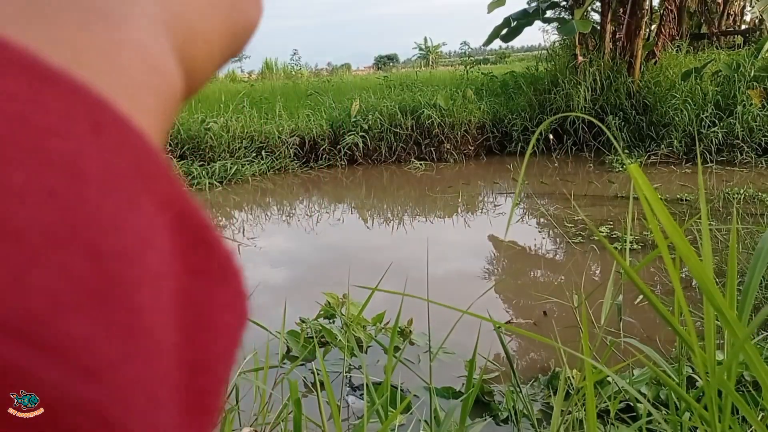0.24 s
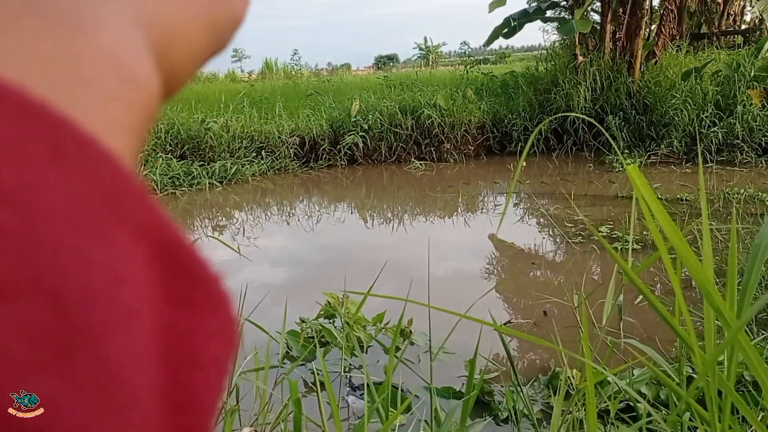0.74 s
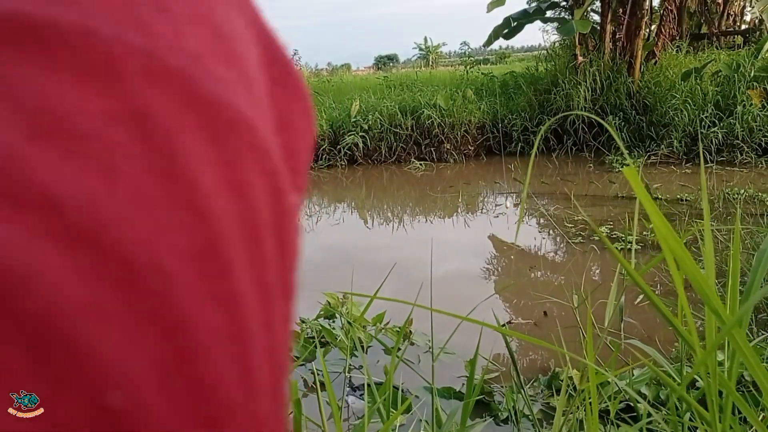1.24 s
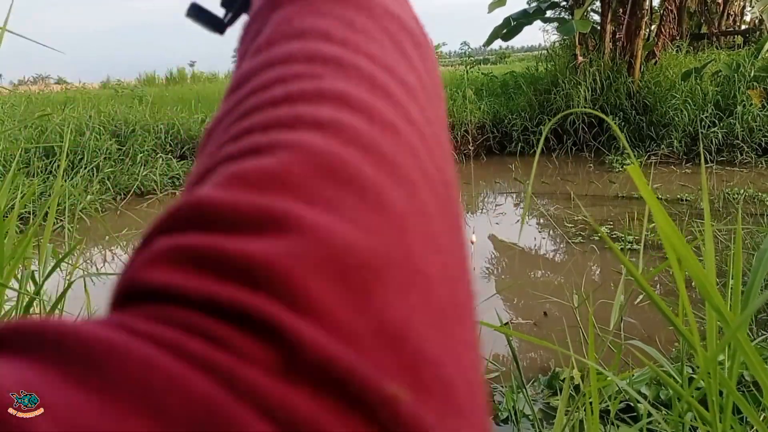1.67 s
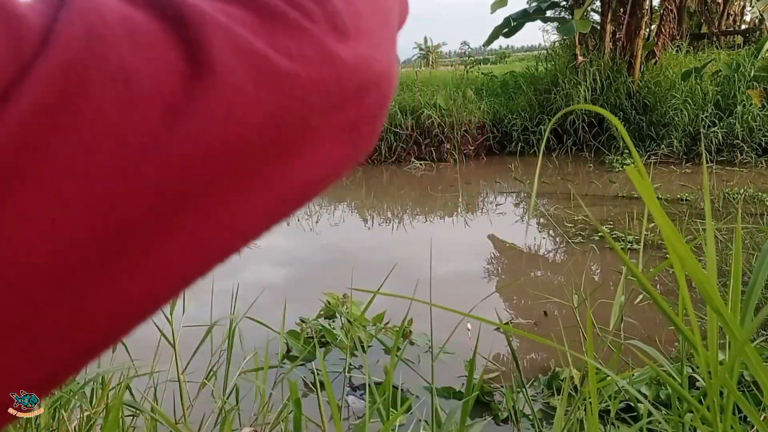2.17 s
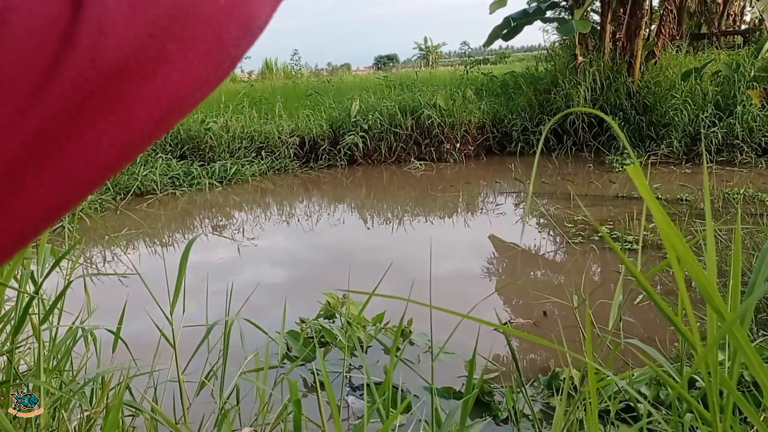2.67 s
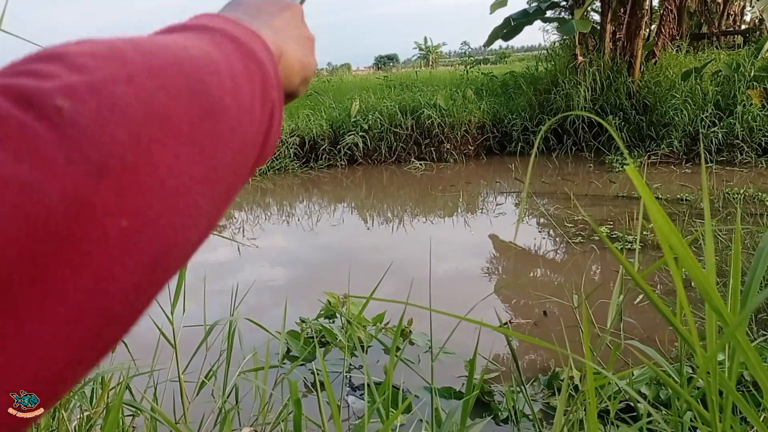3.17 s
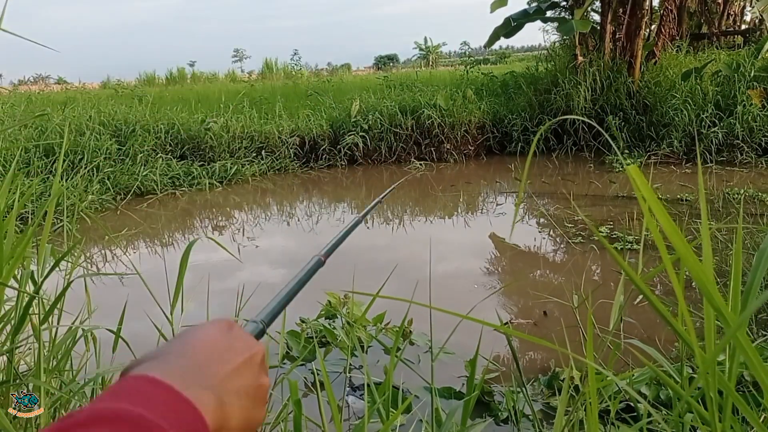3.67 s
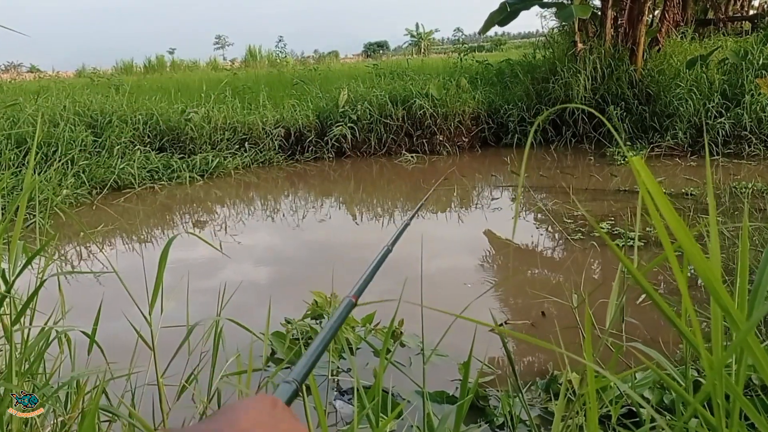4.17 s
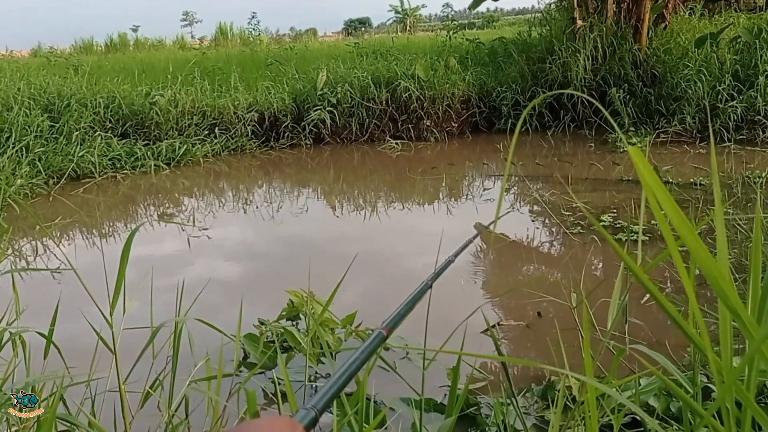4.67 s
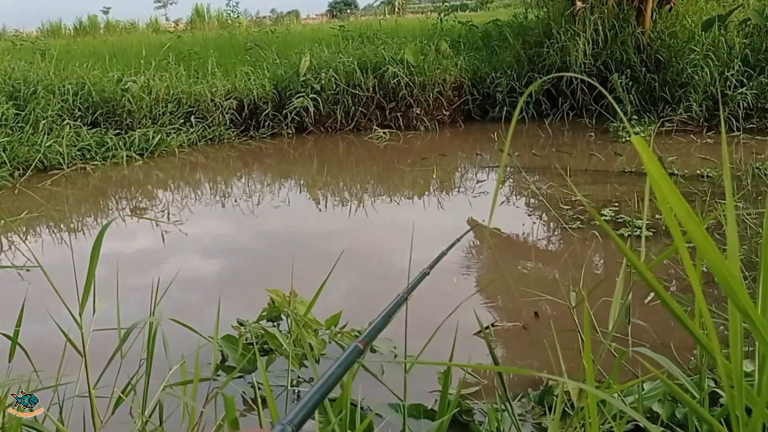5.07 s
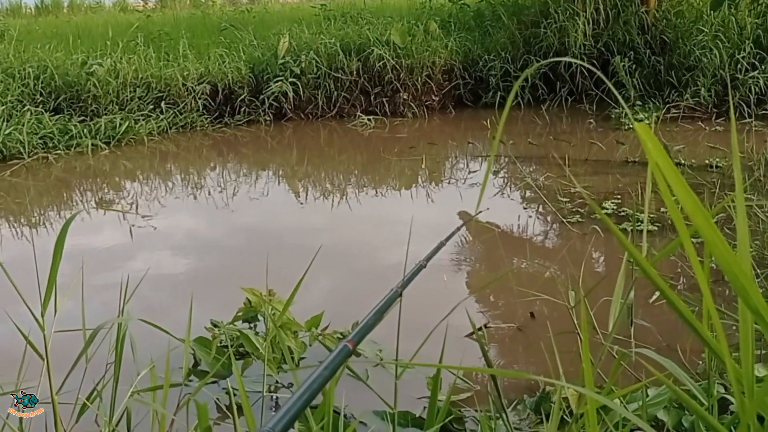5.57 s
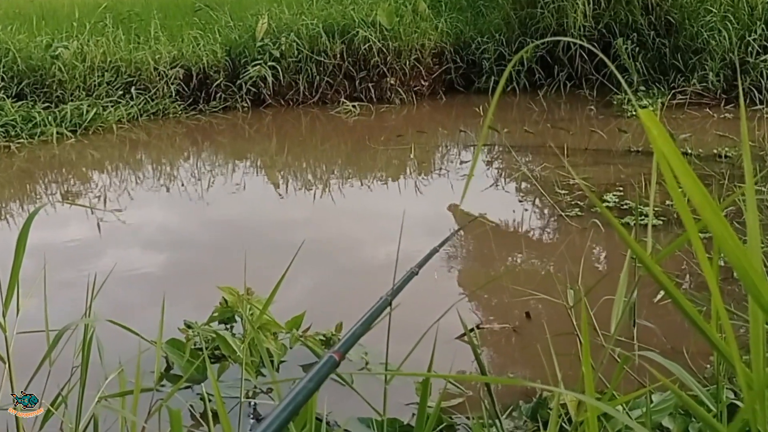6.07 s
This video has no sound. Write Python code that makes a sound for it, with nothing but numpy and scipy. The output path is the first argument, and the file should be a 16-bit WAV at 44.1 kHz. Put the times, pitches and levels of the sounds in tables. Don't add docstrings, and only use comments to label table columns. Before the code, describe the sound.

Open air beside a pond, heard through a small, slightly dull camera microphone. From 0 s a distant engine throbs low and uneven beneath faint hiss, far crickets, tiny high ticking strokes and a thin katydid buzz, strongest near 0.7 s. Light rod taps come at 0.4 s. A mid-high cricket trill swells from 0.9 to 1.5 s, then slows until 1.9 s. Close rod knocks and sharp clicks cluster from 1.7 to 2.8 s, the brightest snap near 2.25 s, with soft sleeve rustling that returns around 3.2-3.6 s. The trill rises again from 2.95 s, slowing from 3.5 to 4.7 s. At 3.2, 3.4 and 3.6 s, a very near cricket gives loud, piercing triplets. Fainter triplets repeat across the water from 4.9 to 5.7 s, with a rod knock at 5.1 s. A third trill swells from 5.3 s and slows after 5.9 s; a faint frog croaks around 5.95 s, and a last knock lands at 6.27 s.

```python
import sys
import numpy as np
from scipy import signal
from scipy.fft import rfft, irfft, next_fast_len
from scipy.io import wavfile
from scipy.ndimage import uniform_filter1d

SR = 44100
rng = np.random.default_rng(int(sys.argv[2]) if len(sys.argv) > 2 else 0)


def log_audio(samples):
    frames = np.atleast_2d(samples).T
    limited = np.clip(frames, -1, 1)
    pcm = np.round(limited * 32767).astype(np.int16)
    wavfile.write(sys.argv[1], SR, pcm)


def invert_db(level):
    return 10 ** (np.asarray(level, dtype=float) / 20)


N = 278705

# f/Hz, spectral level/dB
AIR_SPECTRUM = [(25, -23), (70, -2), (140, -1.5), (300, -14), (700, -22), (1500, -35), (3000, -32.5),
                (4200, -21.5), (5800, -28.5), (6700, -17.5), (8300, -38.5), (9200, -22.5), (11000, -27.5),
                (16000, -25)]
AIR_DB = -50
# t/s, level/dB
CASING_DRONE = [
    (0.0, -51.5),
    (1.53, -43.5),
    (1.56, -55.5),
    (2.34, -56.5),
    (2.36, -51),
    (6.32, -54.5),
]
# t/s, level/dB, time from the top to 10 dB down/s
EXHAUST_SURGES = [(0, -48, 0.22), (.62, -44.5, 0.1), (1.02, -43, 0.07), (1.16, -42.5, 0.13),
                  (1.3, -44, 0.18), (1.47, -49, -0.2), (2.47, -39.5, 0.1123), (2.83, -40, .08),
                  (3.17, -40.5, 0.1), (3.6, -39.5, 0.1159), (3.85, -45, 0.5), (4.28, -39.5, 0.03),
                  (4.84, -40, 0.0261), (5.19, -40, 0.05), (5.74, -44.5, 0.4), (6.32, -44, 0.37)]
IDLE_DB = -61
# t/s, level/dB
CHORUS_BED = [(0, -42.5), (.1, -46), (.35, -43.5), (.55, -44.5), (.65, -51.5), (1.42, -59), (1.46, -75),
              (1.58, -75), (1.7, -59), (2.2, -47.5), (2.46, -60), (2.55, -48.5), (2.95, -48), (3.03, -44.5),
              (3.8, -43), (4.2, -48.5), (5.3, -51), (6.32, -53)]
# first swell t/s, last swell t/s, first level/dB, last level/dB
CHORUS_BOUTS = [
    (.755, 1.164, -44, -48),
    (1.664, 2.3, -46, -42.5),
    (3.655, 4.1, -41.5, -43),
    (3.9, 4.67, -40, -43),
    (4.878, 5.649, -43.5, -43.5),
    (5.9, 5.95, -45.5, -44),
]
CHORUS_GAP_S, CHORUS_FADE_S = .2, 0.078
# peak t/s, level/dB
FAR_CALLS = [(0.015, -47), (1.4547, -44.5), (1.5315, -46.5), (1.733, -47.5), (3.0036, -47), (3.0874, -45.5),
             (3.5294, -44.5), (4.5266, -46.5), (4.6094, -53.5), (4.8309, -51.5), (4.8994, -55),
             (5.2111, -54), (6.065, -47), (6.1514, -46.5), (6.2312, -46.5)]
# first stroke t/s, last stroke t/s, first level/dB, last level/dB
TICKER_BOUTS = [
    (.125, .495, -45, -45.5),
    (.767, 1.115, -46, -47.5),
    (1.327, 2.09, -43, -45.5),
    (2.380, 2.997, -44, -47.5),
    (3.159, 3.44, -44, -53),
    (3.93, 4.42, -48.5, -45.5),
    (4.527, 5.086, -48, -55),
    (5.57, 5.78, -52, -50),
    (6.06, 6.25, -49, -50),
]
TICKER_GAP_S = .07
# t/s, level/dB, depth of the pauses (0-1)
KATYDID_BUZZ = [
    (0.0, -66, 0.9),
    (0.67, -56.5, 0.78),
    (2.08, -62.5, 0.63),
    (2.67, -82, 0.8),
    (4.93, -67.5, 0.4),
    (5.51, -65.5, 0.5),
    (5.91, -70.5, 0),
    (6.32, -63, 0),
]
# t/s, level/dB
CROAK = [
    (5.81, -69),
    (5.87, -58.5),
    (5.95, -55.5),
    (5.99, -60.5),
    (6.03, -71),
]
# f/Hz, bandwidth/Hz, level/dB
FROG_THROAT = [(858.6, 165, 3.5), (1500, 200, 3), (2114, 330, 1)]
# t/s, level/dB
SLEEVE_EFFORT = [(0, -79.5), (1.68, -66.5), (1.78, -55), (1.96, -60.5), (2.24, -48), (2.33, -56),
                 (2.5, -50.5), (2.66, -57.5), (2.74, -63), (2.92, -63.5), (3.17, -46), (3.33, -50.5),
                 (3.6, -47.5), (3.8, -62), (4.1, -64.5), (4.37, -61.5), (4.66, -70.5), (6.32, -82)]
CRISP_LAG_S, CRISP_DB = .025, -0.94
# f/Hz, spectral level/dB
CLOTH_SPECTRUM = [(150, -35), (250, -9), (323, -7.5), (479, -3.5), (689, -1.5), (1190, -10), (1710, -6),
                  (1920, -12.5), (2300, -4.5), (3200, -16.5), (4160, -43.5), (7040, -120)]
# t/s, length/s, f/Hz, bandwidth/Hz, level/dB
CREAKS = [(0.891, 0.058, 1086, 61.6, -66), (1.055, 0.102, 1886, 150, -64), (1.345, .025, 2650, 120, -60.5),
          (1.404, .025, 2665, 120, -53), (3.381, .3, 2300, 450, -51), (1.788, 0.07, 900, 300, -52),
          (1.986, 0.15, 850, 200, -54.5), (3.293, 0.051, 305, 60, -52), (3.531, .14, 333, 71, -44.5),
          (4.014, 0.14, 1430, 150, -59.5), (4.127, 0.051, 840, 120, -58), (6.279, 0.056, 1650, 600, -53.5)]
# t/s, peak level/dB, ring f/Hz, snap level/dB
KNOCKS = [(0.408, -44, 824, -54), (0.44, -42, 2380, -54), (1.741, -35.5, 1940, -53),
          (2.057, -31.5, 2770, -52), (2.262, -31.5, 880, -50), (2.425, -38, 616, -54),
          (2.452, -27.5, 766, -41), (2.54, -29.5, 2530, -35), (2.588, -31, 840, -38),
          (2.668, -34.5, 1600, -54), (2.813, -31, 2914, -35), (3.606, -30, 950, -54),
          (4.328, -38, 640, -51), (4.501, -39, 842, -56), (5.123, -28.5, 700, -54),
          (5.162, -37.5, 1750, -54), (6.27, -27.5, 1900, -56),
          (2.089, -36.5, 2300, -60),
    (2.197, -28, 3100, -62),
    (2.2452, -28, 2780, -30),
    (2.262, -22.5, 2806, -25),
    (2.2777, -33, 2680, -26.5),
    (2.381, -36, 2810, -60),
    (2.60, -33, 2220, -60),
    (5.130, -33, 1030, -60),
]
# last stroke t/s, its level/dB, middle f/Hz
FAR_TRIPLETS = [
    (3.055, -41, 5110),
    (4.892, -31.5, 4714),
    (5.089, -34, 4620),
    (5.277, -33, 4670),
    (5.470, -32, 4730),
    (5.661, -31.5, 4700),
]
TRIPLET_GAP_S, TRIPLET_SWELL_DB = .0293, 0.8
# peak t/s, peak level/dB, peak f/Hz, tail/s
NEAR_CHIRPS = [
    (3.1786, -28, 4530, 0.012),
    (3.2056, -11.5, 5008, 0.0028),
    (3.2346, -10, 4990, 0.01),
    (3.2633, -10, 4993, 0.0108),
    (3.395, -15.5, 4840, 0.011),
    (3.423, -10, 5012, 0.007),
    (3.451, -9.5, 4990, 0.0092),
    (3.5843, -12, 4840, 0.006),
    (3.6112, -8.5, 5000, 0.008),
    (3.6406, -7, 4960, 0.00553),
]
# f/Hz, bandwidth/Hz, level/dB
GROUND_NOTCH = [(4700, 110, -6)]
# first stroke t/s, top level/dB
NEIGHBOUR_PHRASES = [
    (3.812, -40),
    (5.70, -45),
]
# first stroke t/s, last stroke t/s, first level/dB, full level/dB
FAST_RUNS = [
    (.876, 1.484, -52, -26.5),
    (2.950, 3.473, -44.5, -27.5),
    (5.294, 5.860, -49, -27.5),
]
FAST_GAP_S, SWELL_SHARE = .0435, 0.6734
# t/s, peak level/dB
SLOW_STROKES = [(1.5527, -33.5), (1.6137, -34), (1.6749, -34.5), (1.7385, -35.5), (1.8106, -35),
                (1.875, -34.5), (3.5436, -33.5), (3.6004, -33.5), (3.6629, -35), (3.7294, -35.5),
                (3.796, -36), (3.8694, -36), (3.9427, -36.5), (4.0089, -38), (4.0796, -36.5), (4.1458, -37),
                (4.212, -35), (4.2775, -36.5), (4.3486, -36), (4.4114, -34.5), (4.4784, -34.5),
                (4.5472, -36.5), (4.6098, -35), (4.6734, -36), (5.9232, -30), (5.991, -32), (6.0504, -33.5),
                (6.106, -35), (6.1753, -35.5), (6.2378, -35.5)]
SLOW_DROP_HZ = 14.3
SOFT_HZ, FULL_HZ, SOFT_DB, FULL_DB = 3754, 3863, -36, -28.5
# f/Hz, bandwidth/Hz, level/dB
GRASS_PATH = [(3917, 91, -3), (3776, 68, 1), (3733, 14.4, -1), (3573, 78, 6), (3527, 170, -5)]
BANK_ECHO_S, BANK_ECHO_DB = .021, -11
# f/Hz, level/dB
MICROPHONE = [(20, -1.5), (9300, 1), (10500, -15), (12500, -18.5), (14000, -28), (15000, -10.5),
              (15800, -30)]


def rms_one(x):
    return x / np.sqrt(np.mean(x ** 2) + 1e-20)


def in_time(rows):
    s, *columns = np.transpose(rows)
    return [np.interp(np.arange(N) / SR, s, c) for c in columns]


def bandpass(x, order, low_hz, high_hz):
    return signal.sosfilt(signal.butter(order, [low_hz, high_hz], "band", fs=SR, output="sos"), x)


def coloured(x, spectrum):
    size = next_fast_len(N)
    hz, level_db = np.transpose(spectrum)
    bins_hz = np.arange(1, size // 2 + 2) * SR / size
    gain = invert_db(np.interp(np.log(bins_hz), np.log(hz), level_db))
    return irfft(rfft(x, size) * gain, size)[..., :N]


def drift(rate):
    r = np.exp(-2 * np.pi * rate / SR)
    return rms_one(signal.lfilter([1], [1, -2 * r, r * r], rng.standard_normal(N + SR))[SR:])


def resonances(x, modes, flip=-1):
    out = 0
    for k, (hz, width_hz, level_db) in enumerate(modes):
        r = np.exp(-np.pi * width_hz / SR)
        b = np.array([1, 0, -1]) * (1 - r * r) / 2
        a = [1, -2 * r * np.cos(2 * np.pi * hz / SR), r * r]
        out = out + flip ** k * invert_db(level_db) * signal.lfilter(b, a, x + 1e-18)
    return out


def strokes(rows, length_s, fall_hz, peak_at, bend=1.526):
    out, u = np.zeros(N + SR), np.linspace(0, 1, int(length_s * SR))
    shape = np.sin(np.pi / 2 * np.minimum(u / peak_at, (1 - u) / (1 - peak_at))) ** 2
    fall = fall_hz * (peak_at ** bend - u ** bend)
    for s, level_db, hz in rows:
        i = max(int((s - peak_at * length_s) * SR), 0)
        out[i:i + len(u)] += invert_db(level_db) * shape * np.sin(2 * np.pi * np.cumsum(hz + fall) / SR)
    return out[:N]


def scattered(x, t60, wet_db, gap_s=0.0045):
    t = np.arange(int(t60 * SR)) / SR
    spray = rng.standard_normal(SR)[:len(t)] * invert_db(-60 * t / t60) * (t > gap_s)
    return x + invert_db(wet_db) * signal.fftconvolve(x, spray / np.linalg.norm(spray))[:N]


def bouts(rows, gap_s, share=1):
    out = []
    for first_s, last_s, first_db, last_db in rows:
        u = np.linspace(0, 1, 1 + round(max(last_s - first_s, 0) / gap_s))
        level_db = last_db + (first_db - last_db) * np.clip(1 - u / share, 0, 1) ** 2
        out += zip(first_s + u * (last_s - first_s), level_db)
    return out


def swells(rows, under_db, bend=1):
    t = np.arange(N) / SR
    for s, level_db, fade_s in rows:
        under_db = np.maximum(under_db, level_db - 10 * np.abs((t - s) / fade_s) ** bend)
    return under_db


def air():
    gusts = rng.standard_normal(N) * invert_db(0.79 * drift(22))
    return invert_db(AIR_DB) * rms_one(coloured(gusts, AIR_SPECTRUM))


def engine():
    firings = np.diff(np.floor(np.cumsum(22.5 + .6 * drift(.8)) / SR), prepend=0)
    firings = firings * invert_db(6.1 * rng.standard_normal(N))
    push = rms_one(firings) + 0.64 * rng.standard_normal(N)
    exhaust = [(67.5, 28.0, 0)]
    casing = [(110.7, 15.6, -3), (138.3, 24.2, 0.5), (168.9, 65.6, -5.0), (234.7, 30, -9.5)]
    parts = np.array([resonances(resonances(push, modes), modes) for modes in (exhaust, casing)])
    thump, drone = parts / np.sqrt(uniform_filter1d(parts ** 2, size=6000) + 1e-12)
    return invert_db(swells(EXHAUST_SURGES, IDLE_DB)) * thump + invert_db(in_time(CASING_DRONE)[0]) * drone


def choir(hz, spread_hz, fall_hz, length_s, count):
    draw = rng.random((count, 3))
    rows = np.c_[draw[:, 0] * N / SR, -9 * draw[:, 1], hz + spread_hz * (draw[:, 2] - .5)]
    far = scattered(strokes(rows, length_s, fall_hz, peak_at=.48), t60=0.76, wet_db=2)
    far[:SR // 2] += far[N - SR // 2:] * np.linspace(1, 0, SR // 2)
    return far / np.sqrt(uniform_filter1d(far ** 2, size=4000) + 1e-9)


def chorus():
    swelling = choir(hz=4884, spread_hz=460, fall_hz=900, length_s=.021, count=1600)
    steady = choir(hz=3716, spread_hz=156, fall_hz=456, length_s=.04, count=700)
    in_step = [(s, db, CHORUS_FADE_S) for s, db in bouts(CHORUS_BOUTS, CHORUS_GAP_S)]
    swelling_db = swells(in_step, in_time(CHORUS_BED)[0], bend=1.73)
    return invert_db(swelling_db) * swelling + invert_db(-55.5 + 4.0 * drift(0.45)) * steady


def caller():
    rows = [(s + 0.0066 + 0.013 * k, db - 4.5 - 7.8 * k, 6000 - 40 * k) for s, db in FAR_CALLS for k in range(4)]
    return scattered(strokes(rows, length_s=0.027, fall_hz=1600, peak_at=0.5), t60=0.37, wet_db=8.0)


def ticker():
    rows = [(s + 0.0048, level_db - 6.5, 7400) for s, level_db in bouts(TICKER_BOUTS, TICKER_GAP_S)]
    one = scattered(strokes(rows, length_s=0.048, fall_hz=450, peak_at=.4), t60=0.33, wet_db=2.5)
    return one + invert_db(-59.5) * choir(hz=7696.5, spread_hz=402, fall_hz=300, length_s=.03, count=401)


def katydid():
    buzz_db, depth = in_time(KATYDID_BUZZ)
    teeth = (.5 + .5 * np.cos(2 * np.pi * np.cumsum(132 + 1.7 * drift(4.2)) / SR)) ** 1.4
    cycle = (np.arange(N) / SR - .186) / .1308 % 1
    burst = uniform_filter1d(np.clip((cycle - .08) / 0.3, 0, 1) * (0.69 + .3 * cycle), size=300)
    rasp = rng.standard_normal(N) * (0.46 + teeth) * invert_db(2.3 * drift(7.1))
    wings = rms_one(bandpass(rasp, 3, 8780, 9480))
    return invert_db(buzz_db + 3.5) * (1 - np.clip(depth, 0, 1) * (1 - burst)) * wings


def frog():
    pulses = np.diff(np.floor(np.cumsum(110 + 1.494 * drift(19.8)) / SR), prepend=0)
    pulses = pulses + 0.049 * rng.standard_normal(N)
    return invert_db(in_time(CROAK)[0]) * rms_one(resonances(resonances(pulses, FROG_THROAT), FROG_THROAT))


def folded(grains, low_hz, high_hz):
    out = 0
    for k, hz in enumerate(np.geomspace(low_hz, high_hz, 9)):
        out = out + (-1) ** k * invert_db(3.27 * drift(8.4)) * resonances(grains, [(hz, 0.095 * hz, 0)])
    return rms_one(out)


def creaks():
    out = np.zeros(N)
    for s, length_s, hz, width_hz, level_db in CREAKS:
        hollow = [(hz, width_hz, 0)]
        rub = rms_one(resonances(resonances(rng.standard_normal(SR // 2), hollow), hollow))
        size, i = int(1.57 * length_s * SR), int((s - 0.83 * length_s) * SR)
        out[i:i + size] += (invert_db(level_db) * np.hanning(size) * rub[:size])[:N - i]
    return out


def rustle():
    dull_db, = in_time(SLEEVE_EFFORT)
    crisp_db, = in_time([(s + CRISP_LAG_S, db + CRISP_DB) for s, db in SLEEVE_EFFORT])
    clumps = rng.standard_normal(N) * invert_db(2.17 * drift(30) + 0.89 * drift(300))
    grains = coloured(clumps, CLOTH_SPECTRUM)
    dull, crisp = folded(grains, 290, 1095), folded(grains, 1250, 2847)
    fibres = rms_one(bandpass(rng.standard_normal(N) * invert_db(5.4 * drift(130)), 2, 3000, 14000))
    return invert_db(dull_db) * dull + invert_db(crisp_db) * (crisp + invert_db(-2) * fibres) + creaks()


def knocks():
    out, t = np.zeros(N + SR), np.arange(SR // 20) / SR
    soft = signal.butter(4, 3600, fs=SR, output="sos")
    contact = 1 - np.exp(-t / 0.00037)
    for s, level_db, hz, snap_db in KNOCKS:
        noise = rng.standard_normal((2, len(t)))
        band = [(hz * 1.25, hz * 1.1, 3)]
        crunch = resonances(resonances(noise[0] * invert_db(-60 * t / 0.069), band), band)
        crunch = signal.sosfilt(soft, crunch)
        rings = np.sin(2 * np.pi * hz * t) + 0.29 * np.sin(2 * np.pi * 1.316 * hz * t)
        rings = rings * invert_db(-60 * t / (0.0058 + 16 / hz))
        snap = (np.sin(2 * np.pi * 5100 * t) + .5 * noise[1]) * invert_db(-60 * t / 0.00556)
        snap = bandpass(snap, 2, 4200, 7500)
        knock = invert_db(level_db) * contact * (rings + 0.46 * crunch) + invert_db(snap_db + 7.5) * snap
        out[int(s * SR):][:len(t)] += knock
    return out[:N]


def far_chirper():
    rows = [(s - TRIPLET_GAP_S * k, db - TRIPLET_SWELL_DB * k * k, hz) for s, db, hz in FAR_TRIPLETS for k in range(3)]
    return scattered(strokes(rows, length_s=0.015, fall_hz=1160, peak_at=0.43), t60=0.33, wet_db=-5)


def near_chirper():
    out, rise_s = np.zeros(N), .0105
    for s, level_db, hz, tail_s in NEAR_CHIRPS:
        end_s = 1.29 * tail_s
        t = np.arange(-rise_s, end_s, 1 / SR)
        phase = 2 * np.pi * np.cumsum(hz - 48000 * t - 1220000.0 * t * t) / SR
        shape = np.where(t < 0, (1 + t / rise_s) ** 1.33, np.abs(1 - t / end_s) ** 1.01)
        tone = np.sin(phase) + invert_db(-30.5) * np.sin(2 * phase) + invert_db(-18.5) * np.sin(3 * phase)
        out[int((s - rise_s) * SR):][:len(t)] += invert_db(level_db) * shape * tone
    out *= 1 + 0.138 * drift(380)
    return scattered(out - resonances(out, GROUND_NOTCH), t60=0.1, wet_db=-18, gap_s=0.0022)


def neighbour():
    rows = [(s + .0492 * k, db - 0.42 * (k - 4.5) ** 2, 3490) for s, db in NEIGHBOUR_PHRASES for k in range(10)]
    return scattered(strokes(rows, length_s=.024, fall_hz=420, peak_at=0.49), t60=0.21, wet_db=1.0)


def triller():
    rows = []
    for part, drop_hz in [(bouts(FAST_RUNS, FAST_GAP_S, SWELL_SHARE), 0), (SLOW_STROKES, SLOW_DROP_HZ)]:
        for s, db in part:
            hz = np.interp(db, [SOFT_DB, FULL_DB], [SOFT_HZ, FULL_HZ]) - drop_hz
            rows.append((s - .003, db, hz + 40))
    hard = [r for r in rows if r[2] >= 3855]
    soft = [r for r in rows if r[2] < 3855]
    wing = strokes(hard, length_s=.036, fall_hz=570, peak_at=.4, bend=1.87)
    wing += strokes(soft, length_s=.04, fall_hz=464, peak_at=0.44, bend=1.35)
    wing = wing + invert_db(BANK_ECHO_DB) * np.roll(wing, int(BANK_ECHO_S * SR))
    through_grass = invert_db(3) * resonances(wing, GRASS_PATH, flip=0.95)
    return scattered(through_grass, t60=0.52, wet_db=-12, gap_s=0.00747)


def scene():
    background = air() + engine() + chorus() + caller() + ticker() + katydid()
    handling = rustle() + knocks()
    crickets = far_chirper() + near_chirper() + neighbour() + triller()
    return (background + frog() + handling + crickets)[None]


def low_pass(x):
    return signal.sosfilt(signal.butter(12, 16760, fs=SR, output="sos"), x)


def record(dry):
    mix = coloured(dry, MICROPHONE)
    return low_pass(mix)


dry = scene()
out = record(dry)
log_audio(out)
```